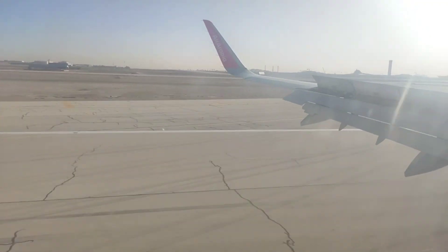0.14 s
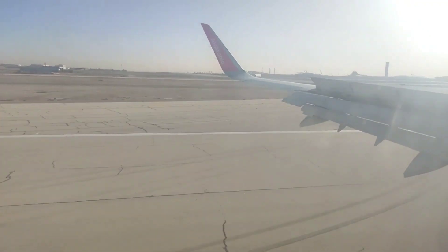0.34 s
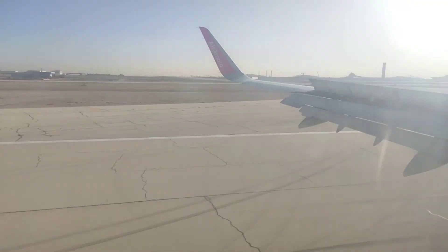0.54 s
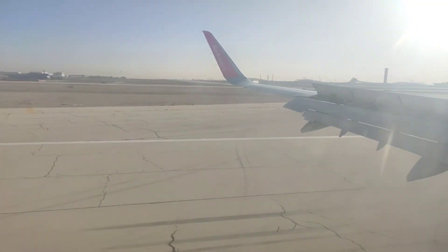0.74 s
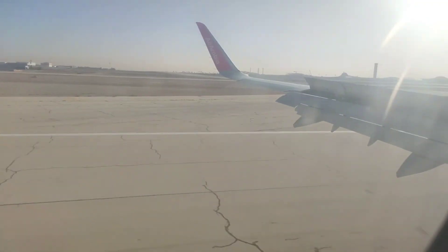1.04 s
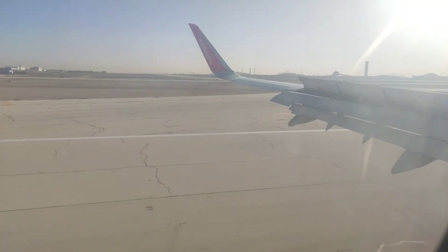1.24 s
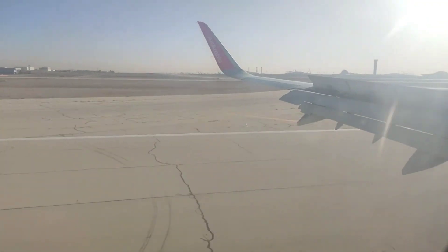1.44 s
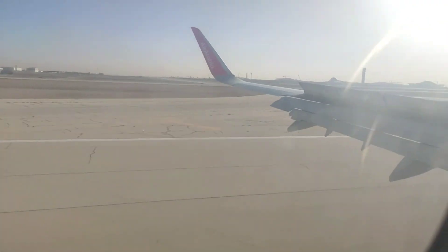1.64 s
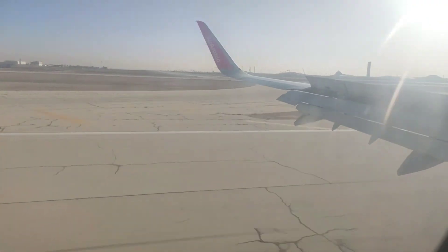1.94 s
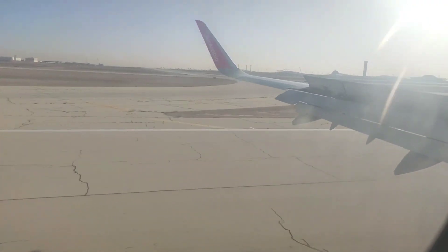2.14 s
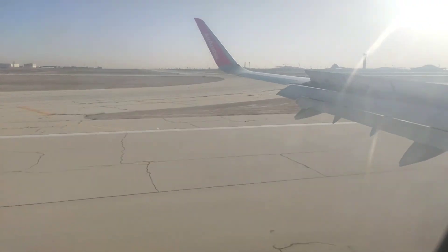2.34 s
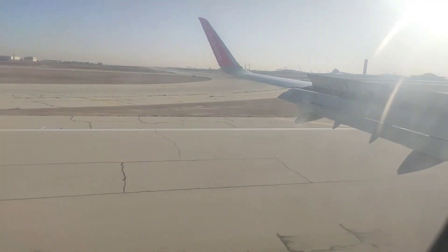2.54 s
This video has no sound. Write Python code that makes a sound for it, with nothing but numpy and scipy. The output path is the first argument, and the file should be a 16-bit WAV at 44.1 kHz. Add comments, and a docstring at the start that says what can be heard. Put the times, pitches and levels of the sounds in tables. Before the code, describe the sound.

Loud, boomy low rumble of wheels and engines inside an airliner cabin slowing on a runway, with early joint thumps, small dry clicks, soft air hiss and a gradual fade, caught by a phone at the window.

```python
"""A boomy rumble, made of noise shaped by the cabin, fills an airliner slowing along the runway.
Wheels and engines shake the fuselage; a wandering tone is a wall panel's boom, and noise around 444 Hz lies above.
Joints in the concrete make the floor ring in thumps; air hisses, made of brighter noise.
Dry clicks and trim ticks are short noise bursts; a faint squeak is a gliding tone.
A phone's two microphones at the window hear it, with the loud swells eased and the highest peaks cut flat."""
import sys
import numpy as np
from scipy import signal
from scipy.fft import rfft, irfft
from scipy.io import wavfile
from scipy.ndimage import uniform_filter1d, minimum_filter1d

SR = 44100
rng = np.random.default_rng(int(sys.argv[2]) if len(sys.argv) > 2 else 0)


def generate_wav(signal):
    """Clip the signal to [-1, 1] and save it as 16-bit WAV at the path in sys.argv[1]."""
    frames = np.transpose(np.atleast_2d(signal))
    scaled = np.clip(frames, -1, 1) * 32767
    pcm = np.round(scaled).astype(np.int16)
    wavfile.write(sys.argv[1], SR, pcm)


N = 119070  # samples, 2.7 s


def from_db(db):
    """Turn decibels into a multiplier for the sound wave."""
    return 10 ** (np.asarray(db) / 20)


def rms_one(x):
    """Scale a sound so that its average strength (rms) is 1."""
    return x / np.sqrt(np.mean(x ** 2) + 1e-20)


def in_time(rows):
    """Draw straight lines between (t/s, value) points, one value per sample."""
    return np.interp(np.arange(N) / SR, *np.transpose(rows))


def at_hz(points, hz):
    """Read a (f/Hz, value) table between its points, spacing pitches as the ear does."""
    table_hz, values = np.transpose(points)
    return np.interp(np.log(hz), np.log(table_hz), values)


def sides(db):
    """Left and right gains that differ by the given decibels."""
    return from_db(np.array([[.5], [-.5]]) * db)


def drift(rate):
    """Random wander with spread 1; a higher rate wanders faster."""
    step = 40  # samples between computed points
    r = np.exp(-2 * step * np.pi * rate / SR)
    noise = rng.standard_normal(N // step + 2002)
    slow = signal.lfilter([1], [1, -2 * r, r * r], noise)[2000:]  # drop the filter's start-up
    return np.interp(np.arange(N) / step, np.arange(len(slow)), rms_one(slow))


# How alike left and right are, 1 same to -1 opposite: f/Hz, likeness
LIKENESS = [(60, 0.95), (180, 1), (300, 1), (520, 0.9), (890, -0.16), (1500, 0.05), (2600, 0.084),
            (4000, -0.52), (8000, 0.082)]
# How much louder left is than right: f/Hz, level/dB
LEFT_LEAN = [(60, 2.5), (210, 4.5), (320, 2.5), (490, 0.1), (740, 3.5), (1130, 5), (1710, 0.6), (2600, 0.6),
             (4000, -6), (8000, -3)]
RIGHT_LAG_S = 0.00019


def diffuse_noise(colour_db, patchy_db):
    """Sound from many directions: stereo noise whose octave bands swell partly together, partly alone."""
    hz = np.maximum(np.arange(N // 2 + 1) * SR / N, 1)
    mid, side = rfft(rng.standard_normal((2, N)))
    alike = np.clip(at_hz(LIKENESS, hz), -1, 1)
    # Shared noise makes the sides alike; noise of opposite sign makes them differ
    pair = np.sqrt(1 + alike) * mid + np.sqrt(1 - alike) * side * [[1], [-1]]
    pair = pair * from_db(colour_db(hz)) * sides(at_hz(LEFT_LEAN, hz))
    pair = pair * np.exp([[0], [-2j]] * hz * np.pi * RIGHT_LAG_S)  # delay the right side
    out, together = 0, drift(0.9)
    for octave in range(4, 15):
        share = np.clip(1 - np.abs(np.log2(hz) - octave), 0, 1)  # overlapping bands
        swell_db = patchy_db * (0.45 * together + drift(8.4))
        out = out + irfft(pair * share, N) * from_db(swell_db)
    return rms_one(out)


# Loudness of roar and hiss: t/s, level/dB
AIR_LEVEL = [(0, -33), (.5, -34), (1.0, -34), (1.8, -35.5), (2.7, -39.5)]
# Tone colour, with the microphone port's peak near 7 kHz: f/Hz, relative level/dB
AIR_COLOUR = [(300, -12), (520, 0), (750, -3), (1100, -13), (1220, -11), (1400, -20), (1770, -19),
              (2400, -24), (3050, -31), (4000, -39), (5200, -43), (6100, -42), (7100, -38.5), (8000, -43),
              (9500, -51), (10500, -60), (11500, -78), (14000, -90)]
AIR_PATCHY_DB = .8


def air():
    """Engine roar and rushing air mix many pitches, so they are coloured noise."""
    noise = diffuse_noise(lambda hz: at_hz(AIR_COLOUR, hz), AIR_PATCHY_DB)
    return from_db(in_time(AIR_LEVEL)) * noise


SQUEAK_START_S, SQUEAK_LENGTH_S = .61, .1
SQUEAK_FROM_HZ, SQUEAK_TO_HZ = 1835, 1895
SQUEAK_DB, SQUEAK_PAN_DB = -53, 12  # peak before panning; left minus right


def squeak():
    """The trim squeaks: a soft tone rises in pitch, mostly on the left, swelling and fading."""
    done = np.clip((np.arange(N) / SR - SQUEAK_START_S) / SQUEAK_LENGTH_S, 0, 1)
    pitch_hz = SQUEAK_FROM_HZ + (SQUEAK_TO_HZ - SQUEAK_FROM_HZ) * done
    tone = np.sin(2 * np.pi * np.cumsum(pitch_hz) / SR)
    return sides(SQUEAK_PAN_DB) * from_db(SQUEAK_DB) * np.sin(np.pi * done) * tone


# Ticks of the trim: t/s, burst level/dB, time to fall 60 dB/s, lower edge f/Hz, left minus right level/dB
TICKS = [(.572, -54, .04, 7000, -6), (.900, -41.5, .075, 6200, -2), (1.484, -48, .045, 2200, -2.5),
         (1.832, -54, .05, 3000, -2)]
TICK_RISE_S, TICK_TOP_HZ = 0.001, 8500
TICK_RING_HZ, TICK_RING_WIDTH_HZ, TICK_RING_GAIN = 3330, 610, 3


def ticks():
    """Trim parts tick: bright noise rises fast and dies away, with a small plastic ring."""
    out = 0
    for start_s, db, t60, low_hz, pan_db in TICKS:
        t = np.maximum(np.arange(N) / SR - start_s, 0)
        high_pass = signal.butter(4, low_hz, "high", fs=SR, output="sos")
        mid, side = signal.sosfilt(high_pass, rng.standard_normal((2, N)))
        shape = (1 - np.exp(-t / TICK_RISE_S)) * from_db(db - 60 * t / t60)
        out = out + sides(pan_db) * (mid + .5 * side * [[1], [-1]]) * shape
    ring = signal.iirpeak(TICK_RING_HZ, TICK_RING_HZ / TICK_RING_WIDTH_HZ, fs=SR)
    out = out + TICK_RING_GAIN * signal.lfilter(*ring, out + 1e-18)  # tiny offset avoids slow maths
    return signal.sosfilt(signal.butter(3, TICK_TOP_HZ, fs=SR, output="sos"), out)


# Dry clicks, placed at loud moments of the rumble: t/s, level/dB
CLICKS = [(.050, -55), (.116, -49), (.144, -50), (.245, -52), (.476, -56), (.739, -51), (.842, -54),
          (1.032, -50), (1.078, -48.5), (1.239, -55)]
CLICK_LOW_HZ, CLICK_TOP_HZ = 1000, 4000
CLICK_SIZE_S = .0012  # from the middle to where the burst has fallen to 37 %


def clicks():
    """Dry clicks: noise bursts a few milliseconds long that stop without a ringing tail."""
    t = np.arange(N) / SR
    band = signal.butter(2, [CLICK_LOW_HZ, CLICK_TOP_HZ], "band", fs=SR, output="sos")
    noise = rms_one(signal.sosfilt(band, rng.standard_normal(N)))
    return noise * sum(from_db(db) * np.exp(-((t - mid_s) / CLICK_SIZE_S) ** 2) for mid_s, db in CLICKS)


# Wheels cross a joint: t/s, strike level/dB
THUMPS = [(.102, -18), (.238, -20), (.733, -18), (1.074, -14)]
# Tones the floor rings with: f/Hz, relative level/dB, time to fall 60 dB/s
FLOOR_MODES = [(185, -6, .1), (308, 0, .14)]
THUMP_SOFT_HZ = 600  # higher pitches are softened


def thumps():
    """Each joint jolts the wheels and sets the floor ringing in fading tones."""
    out = np.zeros(N)
    for start_s, db in THUMPS:
        t = np.maximum(np.arange(N) / SR - start_s, 0)
        for hz, mode_db, t60 in FLOOR_MODES:
            out += from_db(db + mode_db - 60 * t / t60) * np.sin(2 * np.pi * hz * t)
    soften = signal.butter(2, THUMP_SOFT_HZ, fs=SR, output="sos")
    return sides(at_hz(LEFT_LEAN, 250)) * signal.sosfilt(soften, out)


# Loudness of the upper rumble: t/s, level/dB
UPPER_LEVEL = [(0, -24), (.4, -45), (.7, -37), (1.0, -36), (1.4, -41.5), (1.7, -38), (1.95, -35.5),
               (2.15, -31), (2.36, -35), (2.45, -45), (2.57, -35.5), (2.7, -48.5)]
UPPER_HZ, UPPER_WIDTH_HZ, UPPER_PATCHY_DB = 444, 220, 2.5


def upper_rumble():
    """One broad resonance lets noise around its own pitch through, unevenly in time."""
    def colour_db(hz):
        return -20 * np.log10(1 + (2 * (hz - UPPER_HZ) / UPPER_WIDTH_HZ) ** 2)
    return from_db(in_time(UPPER_LEVEL)) * diffuse_noise(colour_db, UPPER_PATCHY_DB)


# A narrow boom of the wall panel surges and shifts, before added wander: t/s, level/dB, f/Hz
PANEL = [(0, -32, 315), (.7, -30, 310), (1.0, -28, 310), (1.035, -13, 310), (1.09, -19, 324),
         (1.13, -30, 305), (1.19, -21, 308), (1.26, -16, 322), (1.31, -22, 325), (1.35, -17, 348),
         (1.4, -19, 320), (1.46, -20, 298), (1.6, -30, 300), (2.7, -33, 305)]
PANEL_WANDER_HZ, PANEL_PATCHY_DB = 7, 2  # spread of the random wander


def panel():
    """The wall panel booms at one pitch at a time, while pitch and strength wander."""
    s, db, hz = np.transpose(PANEL)
    pitch_hz = in_time(np.transpose([s, hz])) + PANEL_WANDER_HZ * drift(15.0)
    level_db = in_time(np.transpose([s, db])) + PANEL_PATCHY_DB * drift(17.0)
    boom = from_db(level_db) * np.sin(2 * np.pi * np.cumsum(pitch_hz) / SR)
    return sides(at_hz(LEFT_LEAN, 320)) * np.sqrt(2) * boom  # root 2 brings a sine to rms 1


# Loudness of the rumble as the plane slows: t/s, level/dB
RUMBLE_LEVEL = [(0, -15), (.15, -9.5), (.45, -13.5), (.75, -11), (.95, -14), (1.2, -12), (1.5, -14),
                (1.85, -14.5), (2.1, -15.5), (2.4, -17), (2.7, -18.5)]
# Tone colour through floor and wall, before the booms: f/Hz, relative level/dB
RUMBLE_COLOUR = [(18, -20.5), (30, -15.5), (48, -10.5), (85, -7), (150, -4), (270, -3), (330, -3.5),
                 (415, -13), (530, -18), (640, -31.5), (900, -37.5), (1500, -82.5)]
# Booming resonances of the cabin: f/Hz, width/Hz, lift/dB (negative is a dip)
BOOMS = [(57, 13, 7.5), (122.2, 9.4, 5.5), (187.4, 22, 6), (213, 11, 3), (253, 6.7, 0.5), (305, 3.7, -3)]
RUMBLE_PATCHY_DB = 0.02


def rumble():
    """Wheels and engines shake the fuselage: noise, shaped by the cabin's resonances."""
    def colour_db(hz):
        lift_db = sum(db / (1 + (2 * (hz - top_hz) / width) ** 2) for top_hz, width, db in BOOMS)
        return at_hz(RUMBLE_COLOUR, hz) + lift_db
    return from_db(in_time(RUMBLE_LEVEL)) * diffuse_noise(colour_db, RUMBLE_PATCHY_DB)


def scene():
    """Add all sources together."""
    return rumble() + panel() + upper_rumble() + air() + thumps() + ticks() + clicks() + squeak()


GAIN_KNEE_DB, GAIN_SHARE, GAIN_SMOOTH_S = -5.5, .62, .008  # share of the excess taken away
CLIP_LEVEL, CUTOFF_HZ, FADE_IN_S = .7, 14500, .004  # full scale is 1


def record(dry):
    """The phone's gain control eases loud swells; peaks are cut flat, the start fades in, the top is cut."""
    span = int(GAIN_SMOOTH_S * SR)
    loudest = np.abs(dry).max(axis=0)  # the louder side steers both
    peak = -minimum_filter1d(-loudest, size=span)  # highest value nearby
    over_db = np.maximum(20 * np.log10(peak + 1e-9) - GAIN_KNEE_DB, 0)
    smooth_db = uniform_filter1d(uniform_filter1d(over_db, size=span), size=span)
    eased = dry * from_db(-GAIN_SHARE * smooth_db)
    cut = np.clip(eased, -CLIP_LEVEL, CLIP_LEVEL)
    fade_in = np.minimum(np.arange(N) / SR / FADE_IN_S, 1)
    low_pass = signal.cheby2(12, 70, CUTOFF_HZ, fs=SR, output="sos")
    return signal.sosfilt(low_pass, cut * fade_in)


dry = scene()
out = record(dry)
generate_wav(out)
```